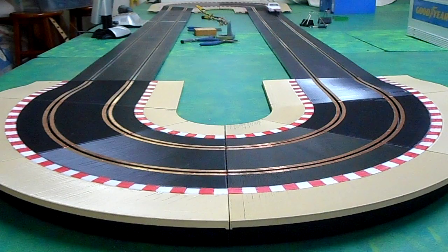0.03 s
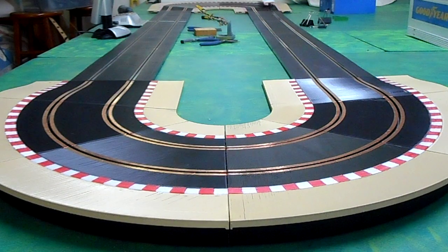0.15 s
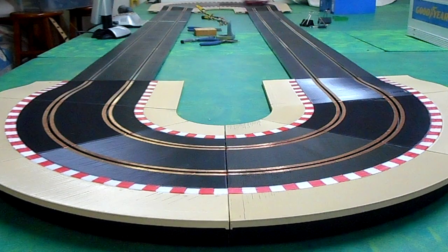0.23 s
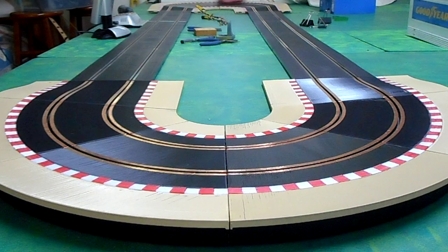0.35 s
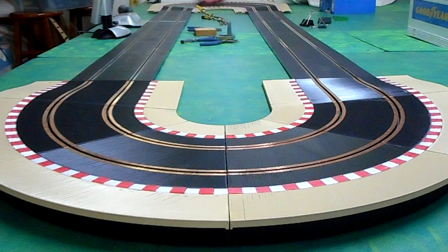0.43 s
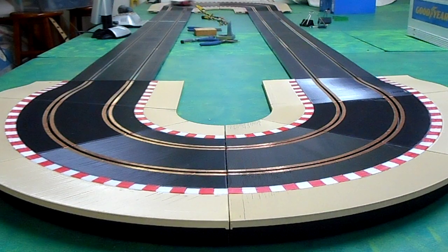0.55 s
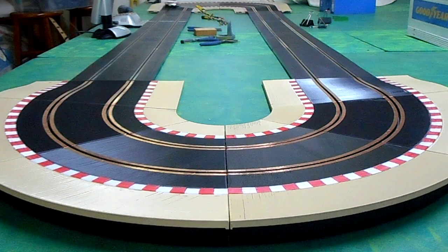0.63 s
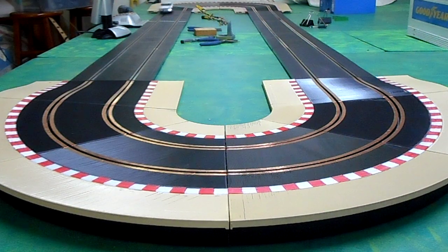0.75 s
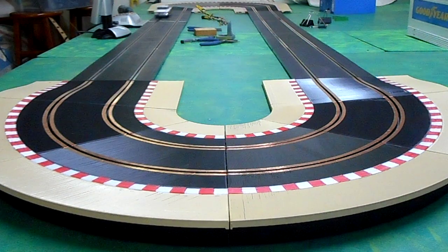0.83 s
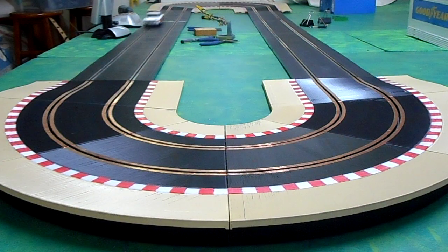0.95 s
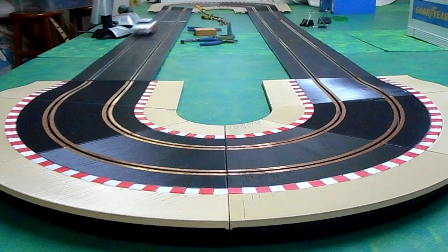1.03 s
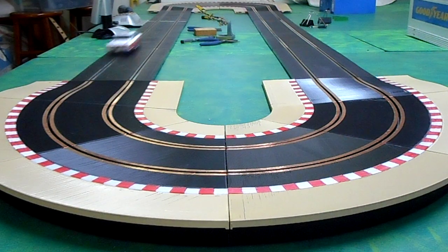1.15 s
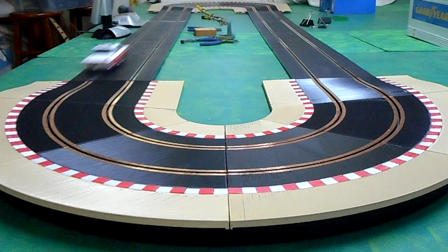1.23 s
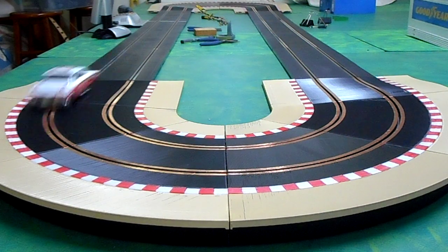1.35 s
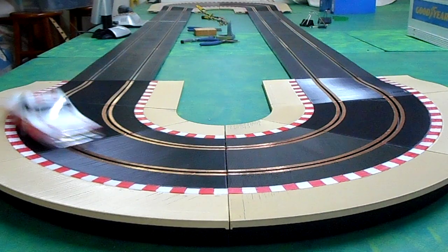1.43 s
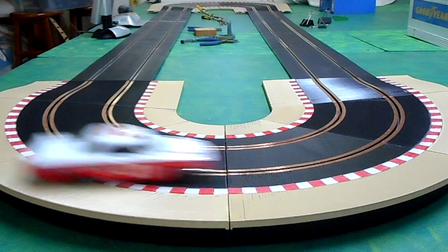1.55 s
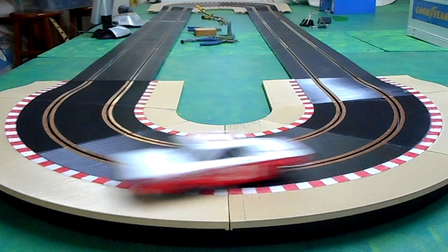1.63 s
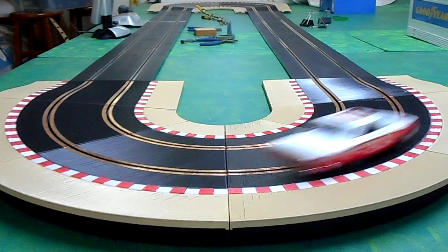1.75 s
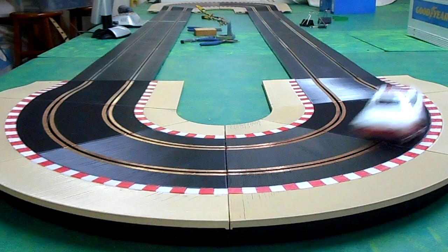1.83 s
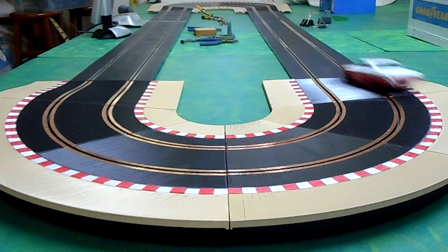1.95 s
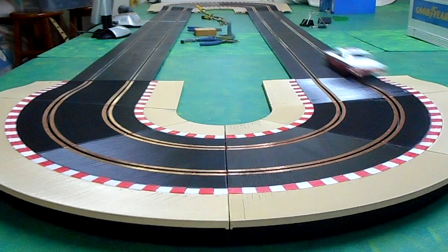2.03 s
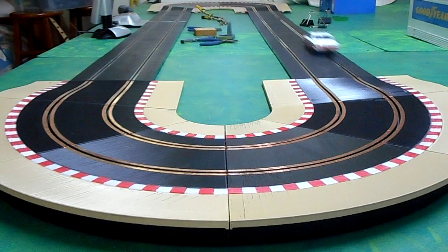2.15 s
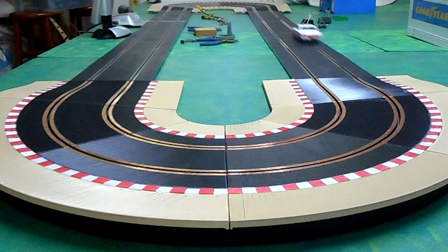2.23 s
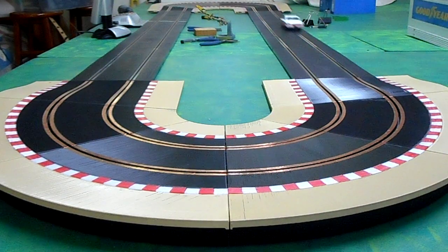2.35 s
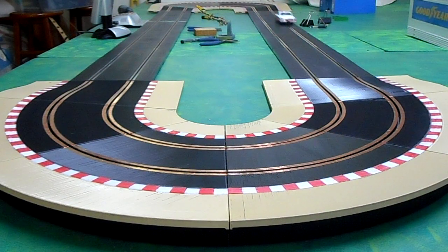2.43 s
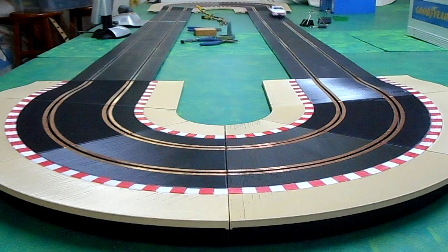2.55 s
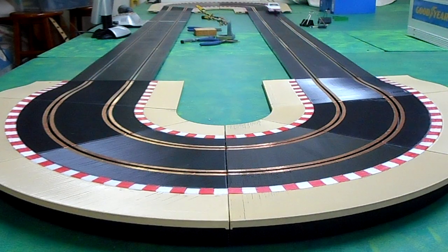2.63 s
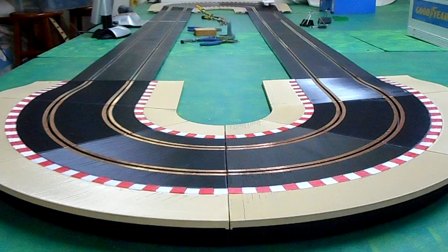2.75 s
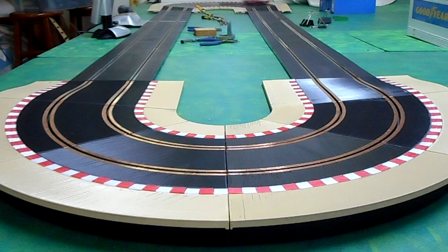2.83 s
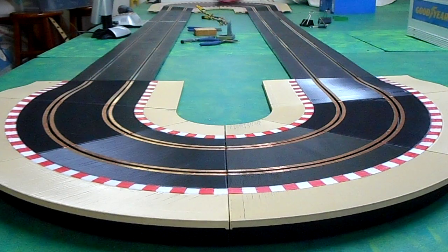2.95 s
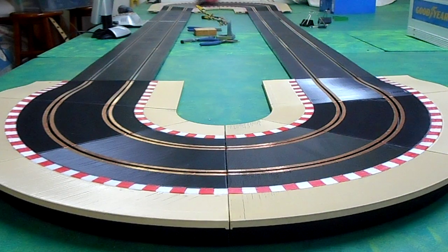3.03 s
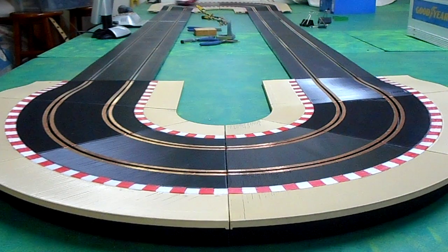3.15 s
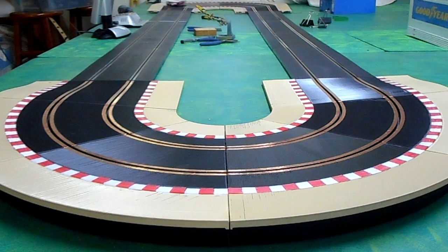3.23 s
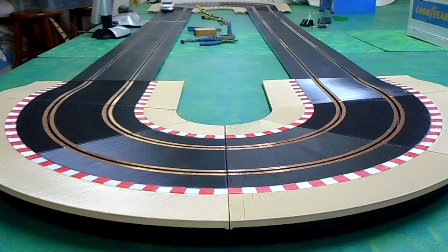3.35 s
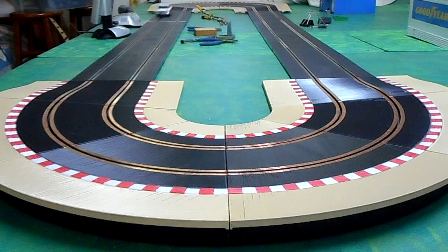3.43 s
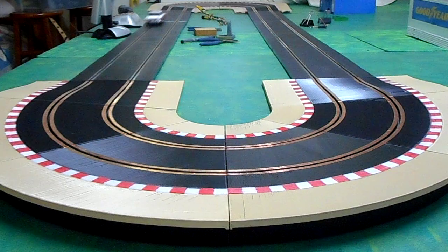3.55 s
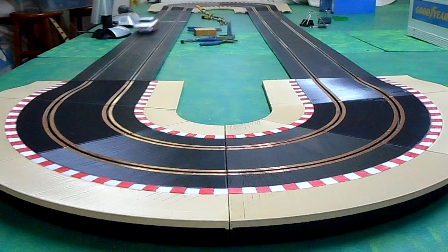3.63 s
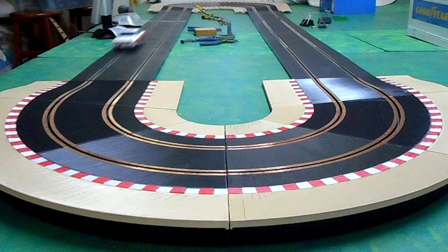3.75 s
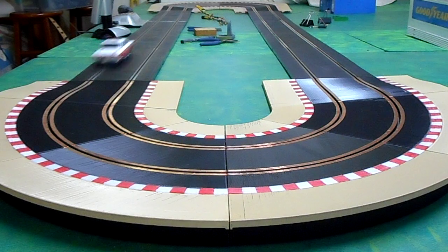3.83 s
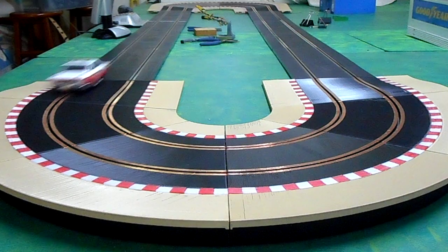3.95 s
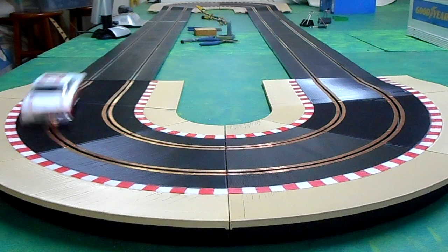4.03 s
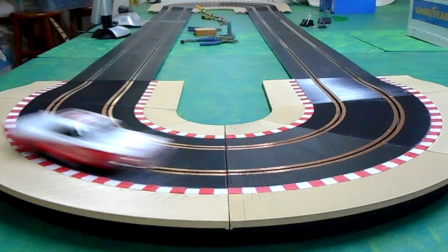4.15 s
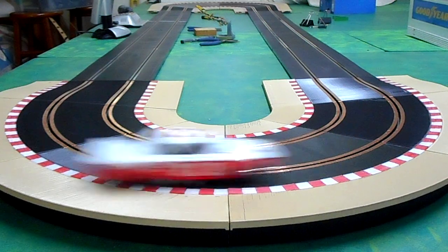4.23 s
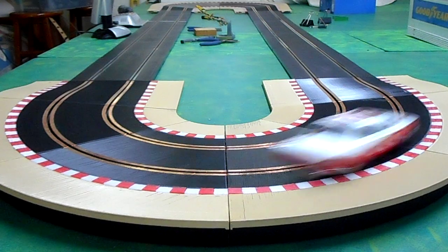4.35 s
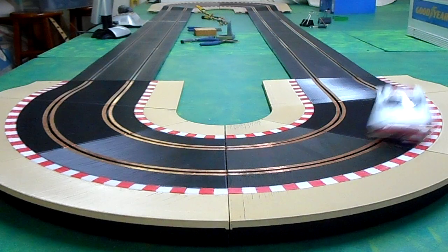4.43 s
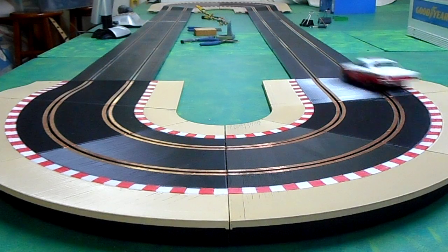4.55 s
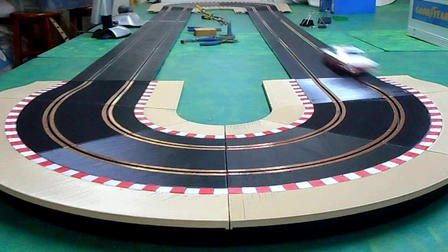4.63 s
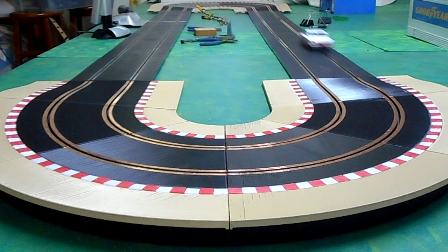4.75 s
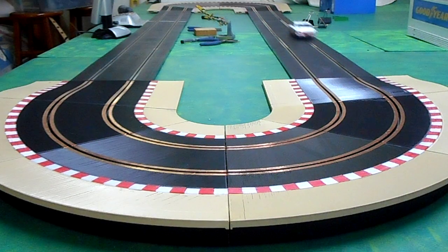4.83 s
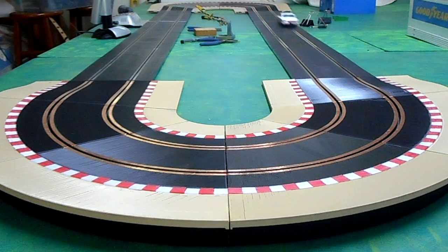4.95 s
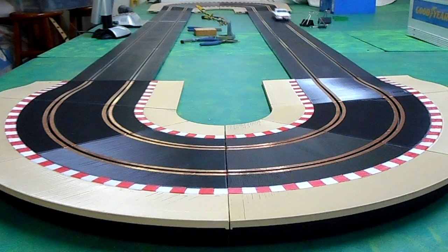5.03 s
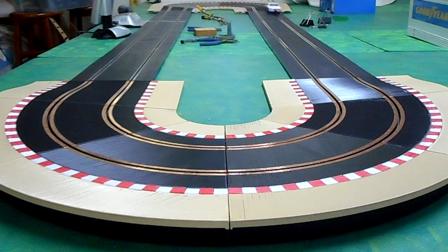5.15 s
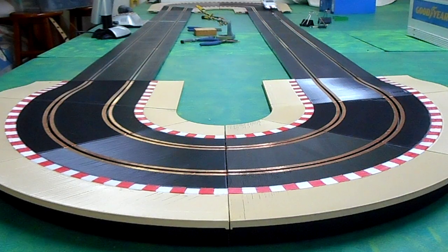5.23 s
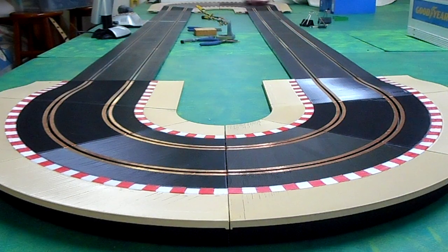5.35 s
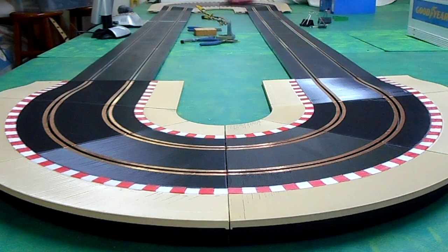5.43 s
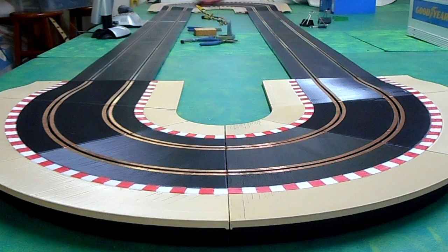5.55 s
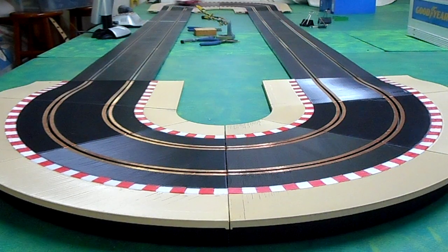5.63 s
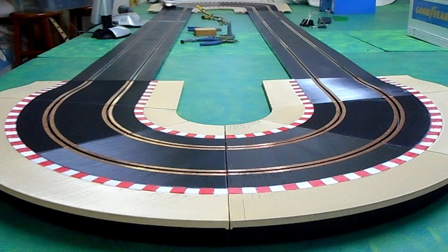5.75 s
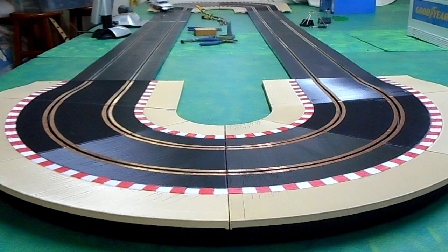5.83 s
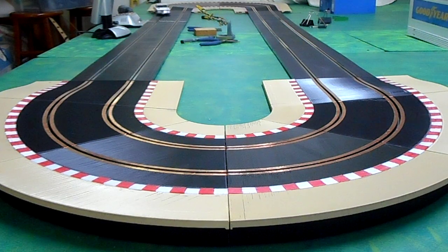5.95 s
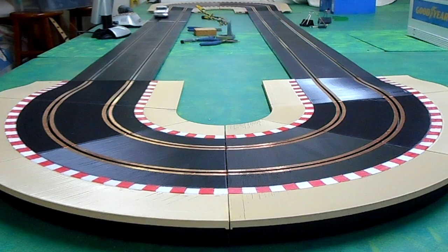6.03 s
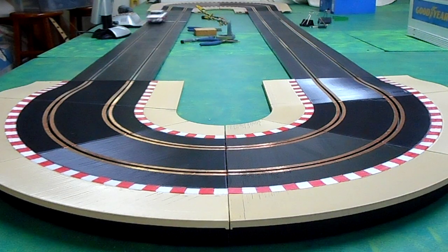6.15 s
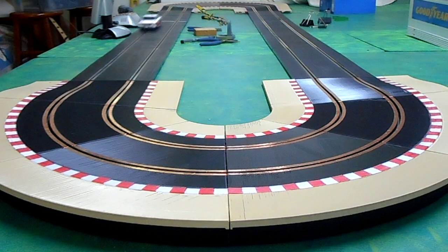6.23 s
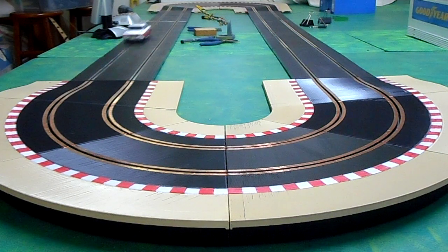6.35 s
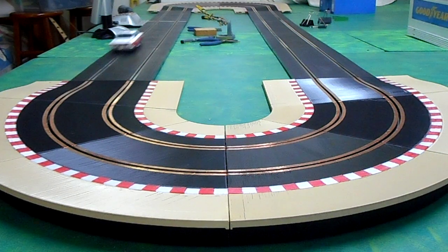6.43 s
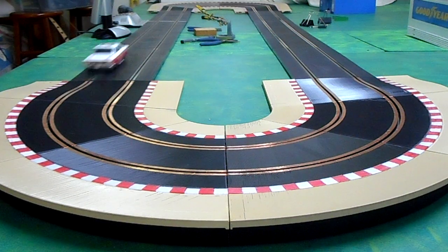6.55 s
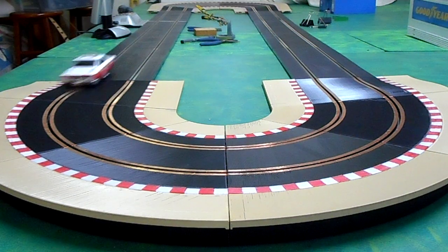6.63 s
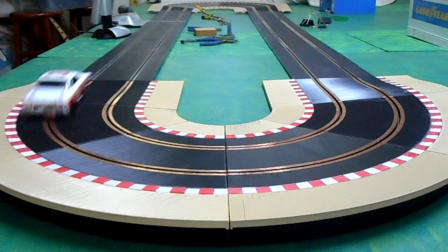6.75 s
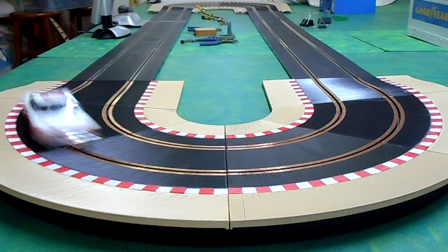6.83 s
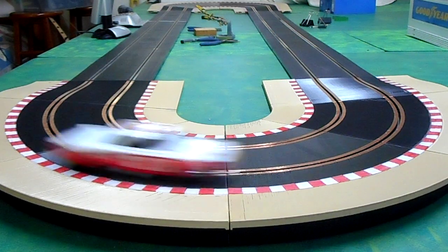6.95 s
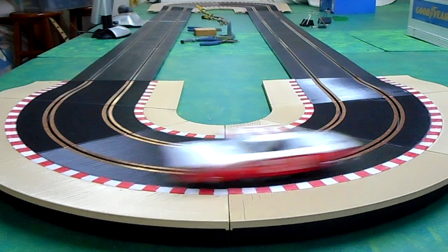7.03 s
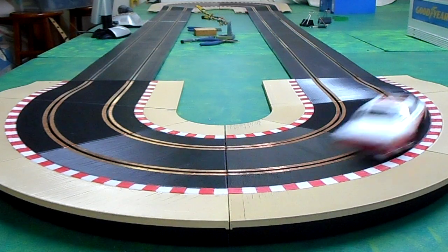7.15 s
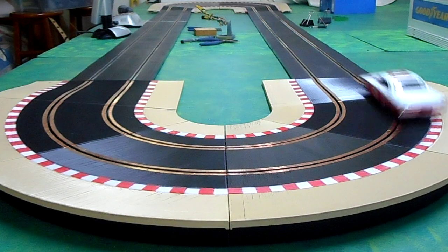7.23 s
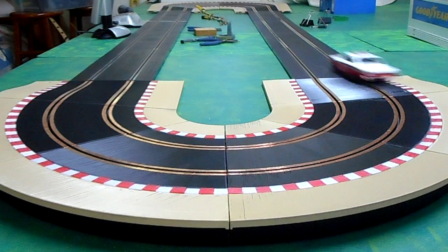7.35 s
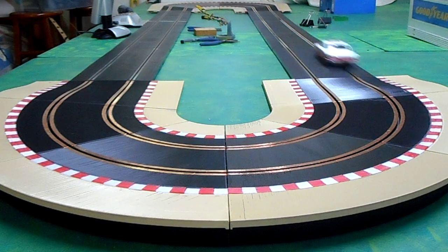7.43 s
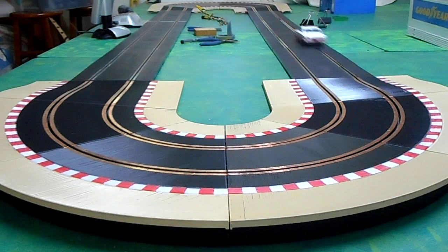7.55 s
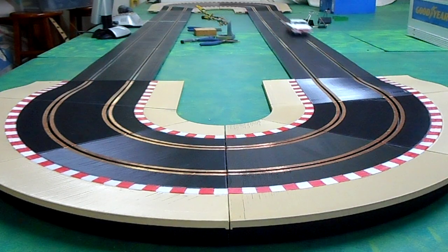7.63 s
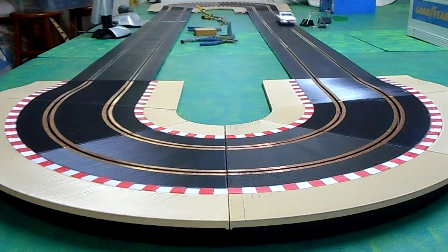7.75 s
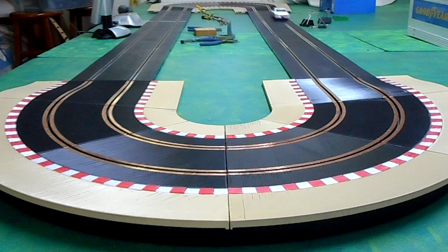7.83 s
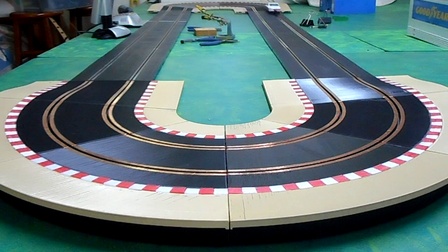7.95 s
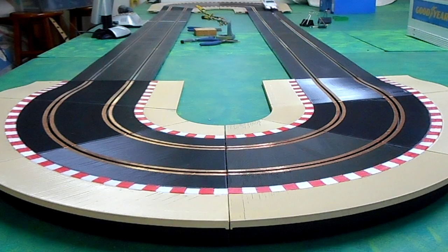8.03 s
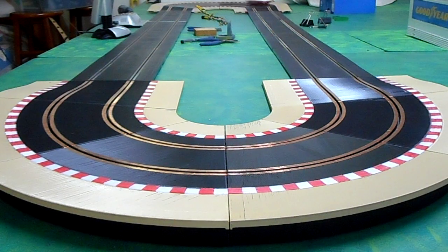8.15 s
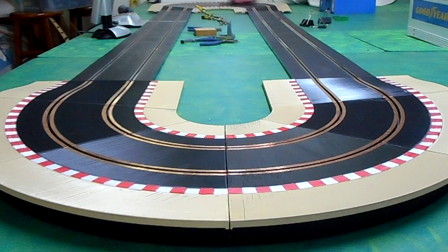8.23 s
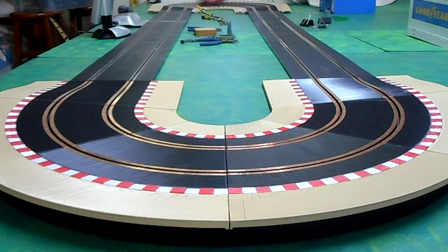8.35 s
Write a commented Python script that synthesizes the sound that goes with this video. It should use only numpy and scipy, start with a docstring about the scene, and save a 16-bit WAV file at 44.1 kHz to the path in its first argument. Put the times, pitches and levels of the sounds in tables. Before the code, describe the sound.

From the start a small electric slot car is already running on a plastic track in a hall, a dry, grainy rattle of shell and tyres with metallic contact squeal, hollow track drumming, weak floor rumble and faint wavering gear whine. Scattered ticks mark the joints. From 1.3 s clicks crowd together; the hardest snaps come at 1.55 to 1.9 s as the car passes the near bend, with hollow knocks at 1.65 s. It recedes, clicking until 2.3 s, and loose pieces clatter at about 3.0 and 3.2 s. A second near pass peaks around 4.25 s, with bright clicks to 4.8 s. Double knocks clatter at 5.8 s on the far side. The noise thins at 6.4 s, then a third pass swells around 6.9 to 7.4 s, with a hard click at 7.35 s. It fades to a duller rattle, ending abruptly at 8.4 s. Quiet hum and short echo throughout.

```python
"""A small electric slot car laps a plastic track on a hall floor, heard from the near bend.
From the start its shell, braids and tyres rattle as shaken resonators over the drumming track and floor,
with faint gear whine, a low hall hum and, 8 ms later, the hall's decaying echo.
From 0.05 s guide and wheels click over joints and knock loose track pieces: noise bursts through resonances.
The hardest clicks come on the near side of the laps, near 1.6-1.9, 4.25 and 7.35 s; the sound stops at 8.4 s."""
import sys
import numpy as np
from scipy import signal
from scipy.io import wavfile
from scipy.ndimage import uniform_filter1d

SR = 44100
rng = np.random.default_rng(int(sys.argv[2]) if len(sys.argv) > 2 else 0)


def put_to_file(sound):
    """Save the sound as 16-bit audio at rate SR, in the file named by the first command-line argument."""
    columns = np.atleast_2d(sound).T  # one column per channel
    safe = np.clip(columns, -1, 1)
    whole_steps = np.round(safe * 32767)
    wavfile.write(sys.argv[1], SR, whole_steps.astype(np.int16))


N = 370428


def undb(db):
    """Decibel law: 20 dB is a factor of ten in amplitude."""
    return 10 ** (np.asarray(db) / 20)


def unit(x):
    """Normalization: a signal divided by its rms has rms 1."""
    return x / np.sqrt(np.mean(x ** 2))


def band(x, hz, width_hz):
    """Simple resonance: a mode passes its centre at gain 1 and weakens the rest."""
    return signal.lfilter(*signal.iirpeak(hz, hz / width_hz, fs=SR), x)


def ring(x, modes):
    """Modal superposition: parallel steep resonances, neighbours of opposite sign."""
    out = 0
    for k, (pitch_hz, width_hz, level_db) in enumerate(modes):
        once = band(x, pitch_hz, 2 * width_hz)
        twice = band(once, pitch_hz, 2 * width_hz)
        out = out + (-1) ** k * undb(level_db) * twice
    return out


def fade(x, t60_s):
    """Exponential decay: each spike falls by 60 dB in t60_s."""
    return signal.lfilter([1], [1, -np.exp(-np.log(1000) / (t60_s * SR))], x)


def walk(rate_hz):
    """Slow random modulation: levels held 1 / rate_hz seconds, smoothed twice, spread near 1."""
    hold = int(SR / rate_hz)
    steps = np.repeat(rng.standard_normal(N // hold + 1), hold)
    smooth = uniform_filter1d(uniform_filter1d(steps, hold), hold)
    return 0.89 * smooth[:N]


def jolts(rate_hz, spread_db, t60_s):
    """Shot process: random small impacts, a few much harder, each with a decaying envelope."""
    hit = rng.random(N) < rate_hz / SR
    strength = undb(spread_db * rng.exponential(size=N))
    return unit(fade(hit * strength, t60_s))


def shaken(modes, shake, flicker_db):
    """Forced vibration: each mode filters its own rubbing noise under a common shake, wavering alone."""
    out = 0
    for mode in modes:
        rubbing = shake * rng.standard_normal(N)
        out = out + undb(flicker_db * walk(20)) * ring(rubbing, [mode])
    return unit(out)


def burst(t60_s, size=5000):
    """Impulsive excitation: noise starts at once and decays by 60 dB in t60_s."""
    t = np.arange(size) / SR
    return rng.standard_normal(size) * undb(-60 * t / max(t60_s, .005))


def add(out, start_s, peak_db, x):
    """Linear superposition: a sound is mixed in at start_s with its peak set to peak_db."""
    i = int(start_s * SR)
    out[i:i + len(x)] += (undb(peak_db) * x / np.abs(x).max())[:N - i]


def pings(modes, rate_hz, t60_s, stray):
    """Free vibration: loose parts struck at random ring as decaying sines a little off each mode."""
    out, t = np.zeros(N), np.arange(int(t60_s * SR)) / SR
    for when, which, off, softness in rng.random((int(rate_hz * N / SR), 4)):
        mode_hz, width_hz, level_db = modes[int(which * len(modes))]
        pitch_hz = mode_hz + stray * width_hz * (off - .5)
        tone = np.sin(2 * np.pi * pitch_hz * t) * undb(-60 * t / t60_s)
        add(out, when * N / SR, level_db - 15.7 * softness, tone)
    return unit(out)


# Place of the car; whole laps lie on the far straight, .15 in the far bend, .6 in the near bend:
# start_s [s], place [laps]
POSITION = [(0, 0.1), (.05, 0), (.45, 0.11), (1.65, .6), (2.64, 1), (3.07, 1.22), (4.27, 1.6), (5.165, 2),
            (5.64, 2.15), (6.3, 2.37), (6.75, 2.5), (7.02, 2.5), (7.957, 3), (8.4, 3.17)]


def place(s):
    """Kinematics: the path driven, in laps, is interpolated over time."""
    return np.interp(s, *np.transpose(POSITION))


# Levels round one lap: place [share of lap], upper_shell_db [dB], track_db [dB], floor_db [dB],
# deep_floor_db [dB]; then against the upper shell: gear_growl_db [dB], braid_squeal_db [dB],
# tyre_hiss_db [dB]; snap_db [dB, clicks add 10]
LAP = [(0, -36.5, -45.5, -61, -75, -4, -1.5, -5.5, -23), (.05, -33, -42, -55, -75, -3, -6, -7.5, -21),
       (.12, -29.5, -37.5, -50, -74, -4.5, -6.5, -8.5, -21.5),
       (.2, -29, -35, -50, -71, -2.5, -5.5, -8, -25), (.27, -30.5, -38.5, -56.5, -69, -4, -4, -6.5, -15),
       (.33, -30.5, -42.5, -57, -68, -6.5, -3.5, -6.5, -15), (.37, -31, -43, -56, -68, -6, -4, -6.5, -15),
       (.42, -34, -43, -55, -67, -2.5, -5.5, -6, -14), (.49, -32.5, -37.5, -53, -66, -0.5, -6.5, -5.5, -13),
       (.55, -29.5, -33.5, -47.5, -58.5, -1.5, -7, -2.5, -11.5),
       (.61, -29, -33.5, -47.5, -58, -5.5, -3.5, -6.5, -23),
       (.67, -29, -36, -46.5, -60, -2.5, 1, -4.5, -30), (.74, -30, -37, -48, -62, -4.5, -2, -5.5, -27),
       (.8, -28, -38.5, -47.5, -63, -8, 0, -5, -26), (.87, -31.5, -39.5, -48, -60, -3, -3, -6, -24),
       (.95, -35, -44, -56, -66, -4, -0.5, -5, -26)]


def lap(s):
    """Periodicity: every level column depends on the car's place alone and repeats each lap."""
    share, *columns = np.transpose(LAP)
    return [np.interp(place(s), share, column, period=1) for column in columns]


# Modes of the shell, the braids and the tyres: pitch_hz [Hz], width_hz [Hz], level_db [dB]
# (each of the two filters in series is twice width_hz wide; the same holds for all mode tables)
SHELL = [(1530, 163, -5), (1927, 188, -1.5), (2340, 453, -5.5), (2786, 585, -5), (3520, 363, -3),
         (3900, 570, -1.5), (4563, 225, -6.5)]
BRAIDS = [(5220, 285, -2.5), (5597, 410, -4.5), (6130, 450, -6.5)]
TYRES = [(6500, 700, 0), (7500, 900, -2), (8600, 1000, -6), (9700, 1000, -10.5)]


def car_rattle(bumps, gear_db, braid_db, tyre_db):
    """Forced and free vibration: gears, braids and tyres shake the shell and ping its loose parts."""
    fine_jolts = jolts(rate_hz=400, spread_db=3.0, t60_s=0.0059)
    shake = 0.8 + 0.36 * bumps + 0.36 * fine_jolts
    car = undb(tyre_db) * shaken(TYRES, shake, flicker_db=1.5)
    # upper shell, gear growl in the lower shell, braid squeal
    layers = [(SHELL[3:], 0, .08), (SHELL[:3], gear_db, .12), (BRAIDS, braid_db, .05)]
    for modes, level_db, t60_s in layers:
        rubbed = shaken(modes, shake, flicker_db=2.5)
        struck = pings(modes, rate_hz=90, t60_s=t60_s, stray=1.163)
        car = car + undb(level_db) * unit(rubbed + undb(-7) * struck)
    return car


# Modes of the hollow track: pitch_hz [Hz], width_hz [Hz], level_db [dB]
TRACK = [(634.4, 95, 0.5), (776, 78, 2.5), (1005, 232, 0.5), (1165, 88, 0), (1300, 153, -2.5)]


def track_drumming(bumps):
    """Structure-borne sound: the car's bumps drive the modes of the hollow track."""
    rubbed = shaken(TRACK, 1.0 + 0.28 * bumps, flicker_db=3.5)
    struck = pings(TRACK, rate_hz=50, t60_s=0.17, stray=1.26)
    return unit(rubbed + undb(-7.5) * struck)


# Modes of the floor, the first two being the deepest: pitch_hz [Hz], width_hz [Hz], level_db [dB]
FLOOR = [(95.5, 15, -5), (129, 16, -8.5), (246, 34, -10), (333, 99, 0), (469, 128, -1.5)]


def floor_rumble(floor_db, deep_db):
    """Forced vibration: steady noise excites the floor's rumble and its deepest thrum."""
    rumble = undb(floor_db) * shaken(FLOOR[2:], 1, flicker_db=3.5)
    thrum = undb(deep_db) * shaken(FLOOR[:2], 1, flicker_db=3.5)
    return rumble + thrum


# Gear whines on stretches of every lap: start [share of lap], end [share of lap],
# from_hz [Hz], to_hz [Hz], level_db [dB, mid-stretch before wavering]
WHINES = [(.04, .13, 2000, 2050, -43), (.28, .36, 1330, 1600, -40), (.41, .57, 2060, 1950, -41.5)]


def whine(now):
    """Tonal radiation: gears give faint sines that swell, glide, waver and fade over their stretch."""
    share, out = place(now) % 1, 0
    for start, end, from_hz, to_hz, level_db in WHINES:
        along = np.clip((share - start) / (end - start), 0, 1)
        glide_hz = from_hz + along * (to_hz - from_hz)
        pitch_hz = glide_hz * (1 + .01 * walk(40))  # wavers by about 1 % of the pitch
        level = undb(level_db + 4.0 * walk(25)) * np.sin(np.pi * along)
        out = out + level * np.sin(2 * np.pi * np.cumsum(pitch_hz) / SR)
    return out


# Sags of the running noise: return_s [s], length_s [s], depth_db [dB]
DIPS = [(.05, .05, -2), (.172, .09, -3), (1.135, .08, -4), (1.36, .04, -2), (1.552, .05, -3),
        (1.725, .04, -4), (2.03, .05, -3), (2.64, .06, -3), (2.77, .06, -3), (2.942, .04, -4),
        (3.8, .04, -3), (4.028, .05, -3), (4.352, .03, -3), (4.57, .05, -4), (4.779, .02, -3),
        (5.164, .06, -4), (5.291, .07, -3.5), (5.968, .04, -2), (6.713, .04, -4), (7.2, .04, -3),
        (7.313, .04, -5), (7.415, .05, -4), (7.958, .05, -3), (8.097, .09, -3)]


def dips(now):
    """Amplitude modulation: the level sinks briefly, stays low, then returns at once."""
    gain_db = 0
    for return_s, length_s, depth_db in DIPS:
        sunk_s = return_s - .6 * length_s  # sinking takes the first 40 % of the dip
        corners_s = [return_s - length_s, sunk_s, return_s]
        gain_db = gain_db + np.interp(now, corners_s, [0, depth_db, depth_db], right=0)
    return undb(gain_db)


# Level against the usual lap: start_s [s], car_db [dB], track_and_floor_db [dB]
PUSH = [(0, 0, 0), (.2, 2, 1), (.5, 0, 0), (.84, -.5, -2.5), (1.0, 2.5, -1.5), (1.25, 1.5, 2), (1.45, 2, 3),
        (1.7, -1, 2), (1.92, 2.5, 2), (2.3, 0, -.5), (2.45, -1.5, -1), (2.7, 1, 0), (2.9, 2, 1),
        (3.1, -.5, 1), (3.33, 2, 2.5), (3.52, 0, 0), (3.9, 0, -2), (4.25, 2, 0), (4.45, -0.5, 1),
        (5.05, 2.5, 2), (5.7, 1, 0), (6.03, 0, 3), (6.14, 0, -3), (6.25, .5, 0), (6.36, -4, 1),
        (6.65, -2.5, -1), (6.74, -1, 2), (6.88, 3, 2), (7.2, 1, 0), (7.55, -1.5, -1), (7.8, -.5, -1),
        (8.05, 0, 1), (8.25, 0, 0), (8.4, 0, 4)]


def running():
    """Superposition: shell, braids, tyres, track, floor and gear whine sound together."""
    now = np.arange(N) / SR
    car_db, track_db, floor_db, deep_db, gear_db, braid_db, tyre_db, _ = lap(now)
    bumps = jolts(rate_hz=120, spread_db=2.1, t60_s=0.041)  # shared by car and track
    start_s, car_push_db, below_push_db = np.transpose(PUSH)
    car_level = undb(car_db + np.interp(now, start_s, car_push_db))
    car = car_level * car_rattle(bumps, gear_db, braid_db, tyre_db)
    below = undb(track_db) * track_drumming(bumps) + floor_rumble(floor_db, deep_db)
    below = undb(np.interp(now, start_s, below_push_db)) * below
    return dips(now) * (car + below + whine(now))


# Broad low resonances of the hall's hum: pitch_hz [Hz], width_hz [Hz], level_db [dB]
HALL_HUM = [(60.5, 6.7, -15), (121, 55, 0.5), (221, 240, -1)]


def hall_hum():
    """Band-limited noise: low resonances filter steady noise into a quiet hum."""
    return undb(-61.5) * shaken(HALL_HUM, 1, flicker_db=1.7)


def hall_echo(x):
    """Reverberation: convolution with noise delayed 8 ms and decaying by 60 dB in 0.3 s."""
    delay = np.zeros(int(.008 * SR))
    tail = np.concatenate([delay, burst(t60_s=.3, size=16384)])
    tail = tail / np.sqrt(np.sum(tail ** 2))  # unit energy
    return undb(-18) * signal.fftconvolve(x, tail)[:N]


# Guide and wheels over the joints: start_s [s], peak_db [dB], pitch_hz [Hz, strongest ring], t60_s [s]
CLICKS = [(0.0498, -14, 2370, 0.084), (0.1716, -15.5, 4480, 0.16), (0.378, -17, 2600, 0.06),
          (0.4896, -15, 3570, 0.04), (1.03, -17, 2060, 0.1), (1.168, -18, 2300, 0.06),
          (1.318, -17, 1900, 0.08), (1.361, -11, 3660, 0.027), (1.39, -11.5, 4040, 0.077),
          (1.4518, -11.5, 3850, 0.05), (1.4778, -12, 3740, 0.028), (1.4834, -14, 3420, 0.045),
          (1.5523, -4.5, 1840, 0.027), (1.6005, -12, 3890, 0.074), (1.6253, -7.5, 1640, 0.054),
          (1.6599, -9, 3400, 0.067), (1.7233, -16, 6430, 0.054), (1.7374, -18, 1820, 0.036),
          (1.7853, -11.5, 1910, 0.05), (1.907, -4, 5660, 0.032), (1.9714, -12, 5230, 0.03),
          (2.0078, -14, 1900, 0.043), (2.0291, -10.5, 3730, 0.073), (2.1067, -11.5, 5500, 0.04),
          (2.2019, -13, 3570, 0.05), (2.2296, -14, 3630, 0.1), (2.311, -18, 5190, 0.05),
          (2.639, -14, 2280, 0.077), (2.826, -17, 4200, 0.08), (2.9417, -11.5, 3700, 0.07),
          (2.975, -15.5, 2600, 0.1), (3.0814, -16, 3760, 0.053), (3.382, -17, 1900, 0.1),
          (3.8287, -16.5, 3560, 0.036), (3.95, -16, 1950, 0.08), (4.029, -10, 3790, 0.064),
          (4.087, -13.5, 1960, 0.12), (4.252, -6, 3450, 0.028), (4.3163, -12, 6450, 0.062),
          (4.3507, -10.5, 4680, 0.11), (4.4255, -13, 5900, 0.062), (4.501, -9.5, 3920, 0.032),
          (4.5685, -14.5, 3600, 0.08), (4.5963, -8.5, 4230, 0.036), (4.7481, -11, 5170, 0.039),
          (4.779, -10, 5500, 0.036), (4.916, -15, 5800, 0.05), (5.163, -12, 3400, 0.14),
          (5.2918, -15.5, 1950, 0.12), (5.634, -12, 3620, 0.08), (5.7713, -10, 3180, 0.095),
          (5.9104, -17, 2500, 0.088), (5.972, -14.5, 2000, 0.1), (5.992, -15, 2200, 0.08),
          (6.246, -18, 3600, 0.05), (6.7141, -20, 3790, 0.05), (6.7498, -12, 4070, 0.065),
          (6.852, -12.5, 2300, 0.06), (6.9973, -9, 3430, 0.04), (7.111, -7, 3840, 0.034),
          (7.1293, -13, 1900, 0.058), (7.225, -14.5, 2000, .08), (7.313, -12, 5600, 0.035),
          (7.3509, -5.5, 3700, 0.04), (7.42, -13, 5700, 0.074), (7.4677, -14, 5770, 0.056),
          (7.6588, -15, 5400, 0.027), (7.9588, -16, 2420, 0.08), (8.097, -17.5, 2170, 0.11),
          (8.176, -15.5, 2200, 0.14), (8.2993, -13.5, 2600, 0.08)]


def clicks():
    """Impact excitation: a hard contact and short scrape ring shell, braids and wheels."""
    out = np.zeros(N)
    for start_s, peak_db, pitch_hz, t60_s in CLICKS:
        blow = burst(t60_s)
        blow[0] = 5  # the first contact is the hardest
        body = unit(ring(blow, SHELL + BRAIDS))
        spot = unit(band(blow, pitch_hz, .25 * pitch_hz))  # where the blow lands
        snap = unit(ring(blow, TYRES))
        snap_db = lap(start_s)[-1] + 10
        add(out, start_s, peak_db, body + undb(1.0) * spot + undb(snap_db) * snap)
    return out


# Track pieces knocked against the floor: start_s [s], peak_db [dB], pitch_hz [Hz], t60_s [s, piece's ring]
KNOCKS = [(0.057, -27, 1217, 0.082), (1.318, -23.5, 1144, 0.098), (1.552, -12.5, 610, 0.049),
          (1.66, -8.5, 689, 0.11), (1.684, -13, 720, 0.12), (2.228, -25, 777, 0.05),
          (2.948, -24, 643, 0.14), (2.977, -16, 870, 0.044), (2.994, -14.5, 1272, 0.13),
          (3.014, -20.5, 828, 0.12), (3.16, -13.5, 727, 0.11), (3.174, -13.5, 840, 0.054),
          (3.189, -18.5, 791, 0.15), (3.951, -21, 1270, 0.062), (4.022, -22, 641, 0.34),
          (4.095, -21.5, 667, 0.21), (4.119, -21, 825, 0.12), (4.252, -20.5, 880, 0.057),
          (5.169, -25, 1170, 0.12), (5.77, -11.5, 680, 0.082), (5.784, -12.5, 1197, 0.12),
          (5.811, -12.5, 1190, 0.095), (5.967, -21, 1280, 0.13), (5.982, -21.5, 787, 0.14),
          (6.502, -26, 1186, 0.12), (6.753, -20, 774, 0.05), (6.804, -28, 1270, 0.11),
          (6.857, -18.5, 1240, 0.076), (6.933, -22, 1090, 0.092), (6.998, -17.5, 638, 0.085),
          (7.133, -23, 1210, 0.11), (7.226, -25, 638, 0.15), (7.346, -22, 1310, 0.097),
          (8.351, -23.5, 677, 0.21)]


def knocks():
    """Coupled vibration: a struck piece rings at its own pitch; the track drums along and rattles on."""
    out = np.zeros(N)
    for start_s, peak_db, pitch_hz, t60_s in KNOCKS:
        blow = burst(t60_s=0.027)
        soft = band(blow, pitch_hz, .4 * pitch_hz)
        ring_width_hz = np.log(1000) / np.pi / max(t60_s, .02)  # a narrower mode rings longer
        piece = unit(band(soft, pitch_hz, ring_width_hz))
        drum = unit(ring(blow, TRACK[1:]))
        rattle = unit(ring(burst(t60_s=.17), TRACK[1:] + SHELL[:1]))
        add(out, start_s, peak_db, piece + undb(-5) * drum + undb(-7) * rattle)
    return out


def scene():
    """Sound field: direct sound of car and track, their echo from the hall, and the hall's hum."""
    direct = running() + clicks() + knocks()
    return (direct + hall_echo(direct) + hall_hum())[None]


def record(dry):
    """Sampling and aliasing: half-rate samples, gaps filled by a short filter, leave a faint treble mirror."""
    low_cut = signal.butter(3, 56, "high", fs=SR, output="sos")
    treble_edge = signal.cheby2(12, 45, 11000, fs=SR, output="sos")
    x = signal.sosfilt(treble_edge, signal.sosfilt(low_cut, dry))
    x = x * (1 + (-1.) ** np.arange(N))  # every other sample is zero, the rest doubled
    x = signal.fftconvolve(x, signal.firwin(51, SR / 4, fs=SR)[None], mode="same")
    top_cut = signal.ellip(10, .2, 60, 12400, fs=SR, output="sos")
    return signal.sosfilt(top_cut, x)


dry = scene()
out = record(dry)
put_to_file(out)
```